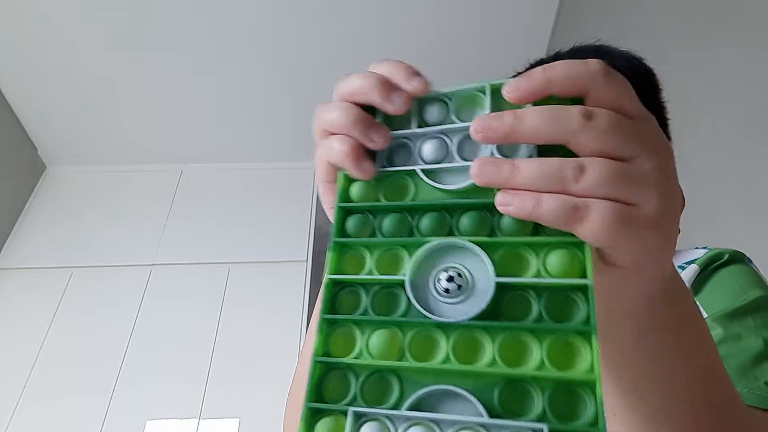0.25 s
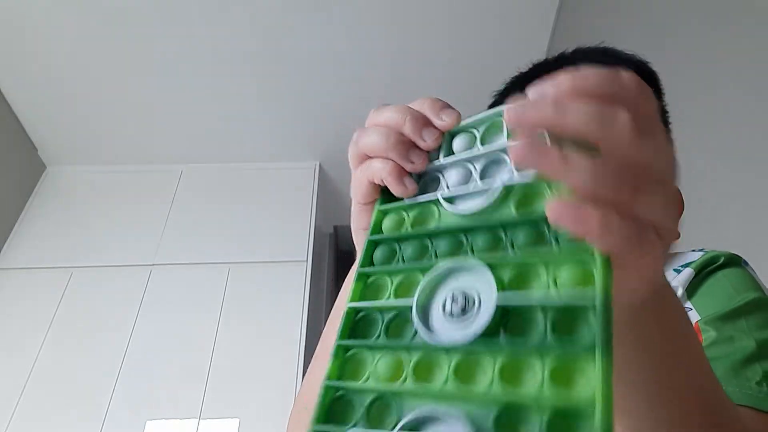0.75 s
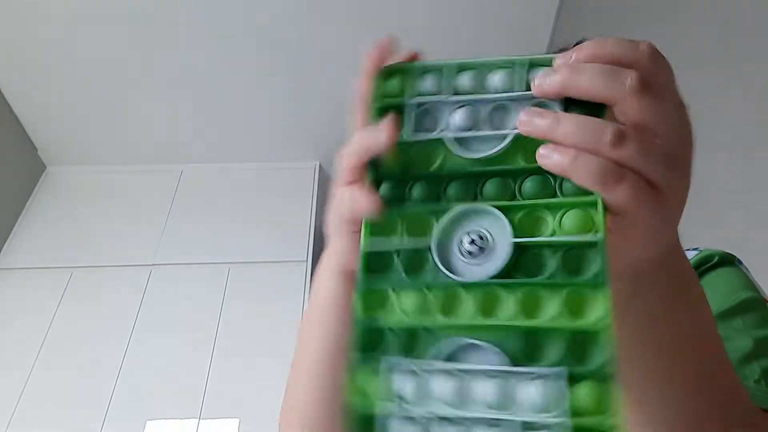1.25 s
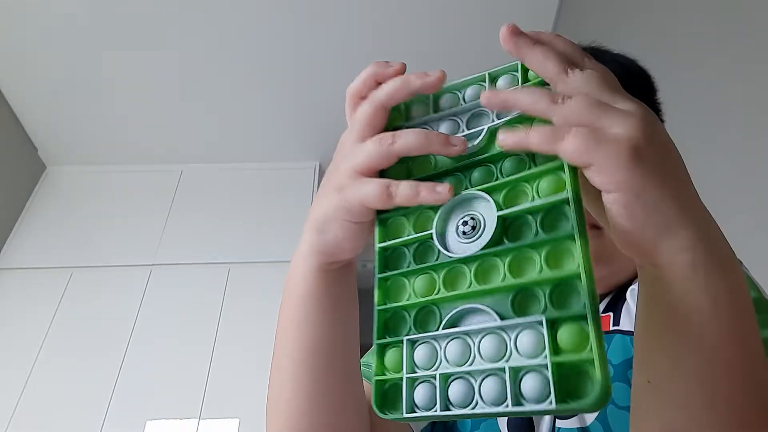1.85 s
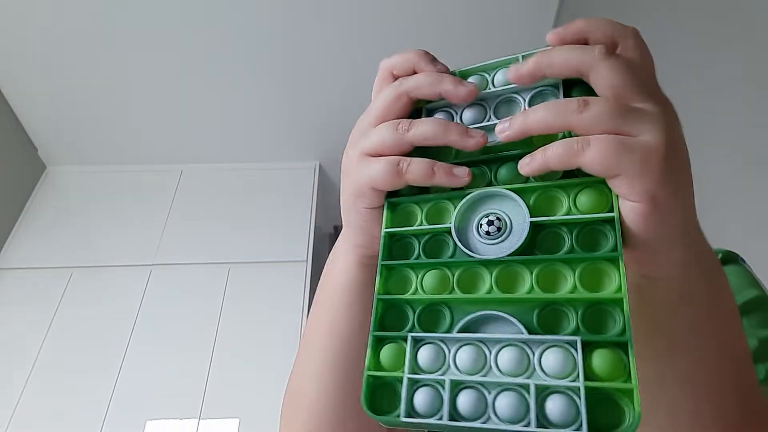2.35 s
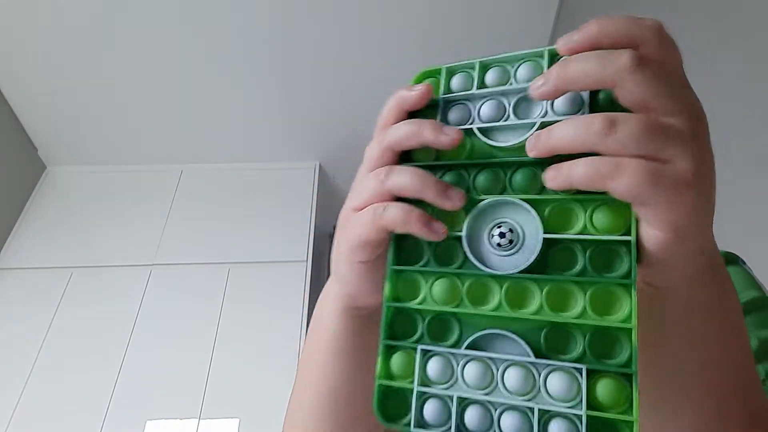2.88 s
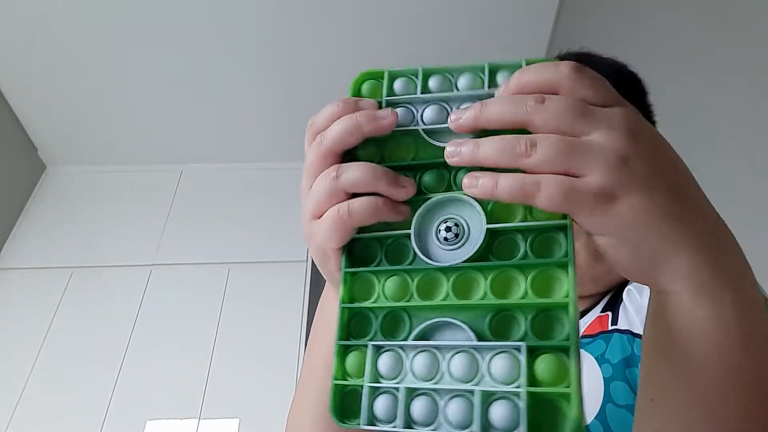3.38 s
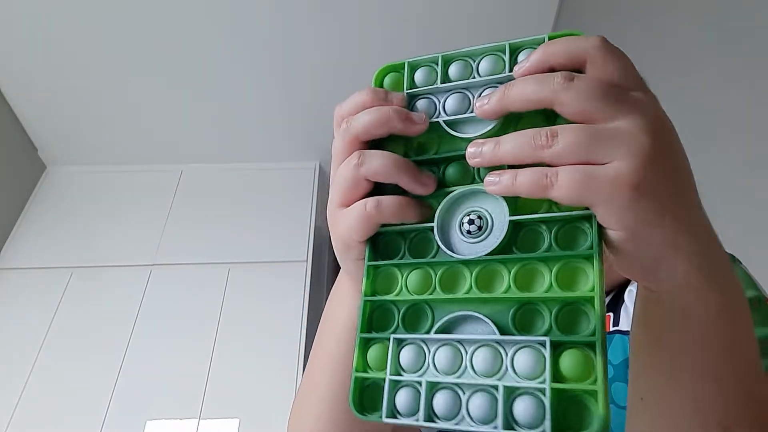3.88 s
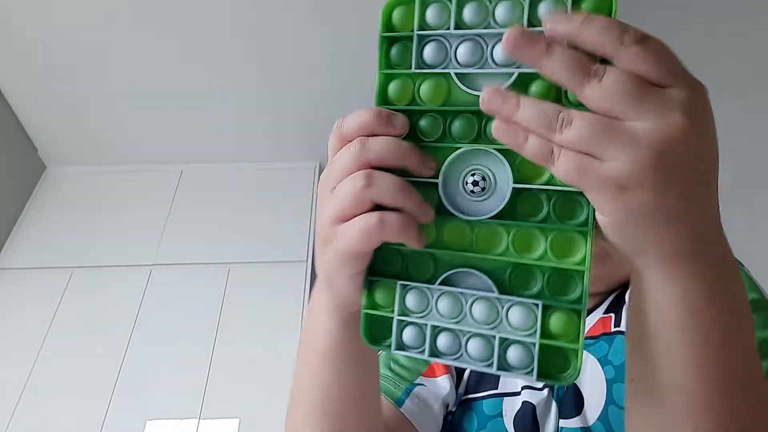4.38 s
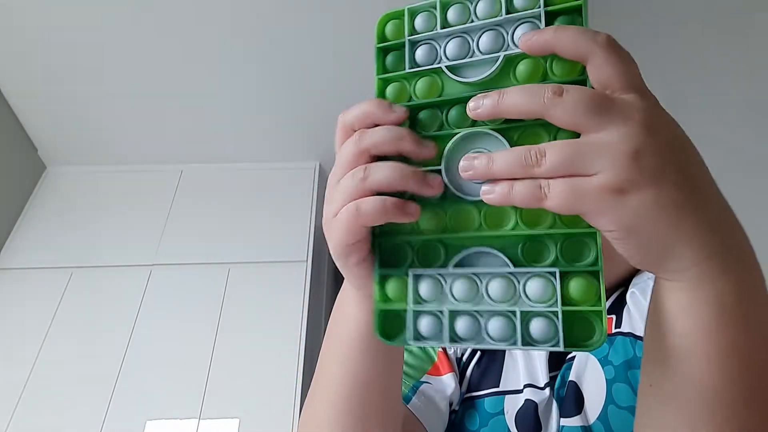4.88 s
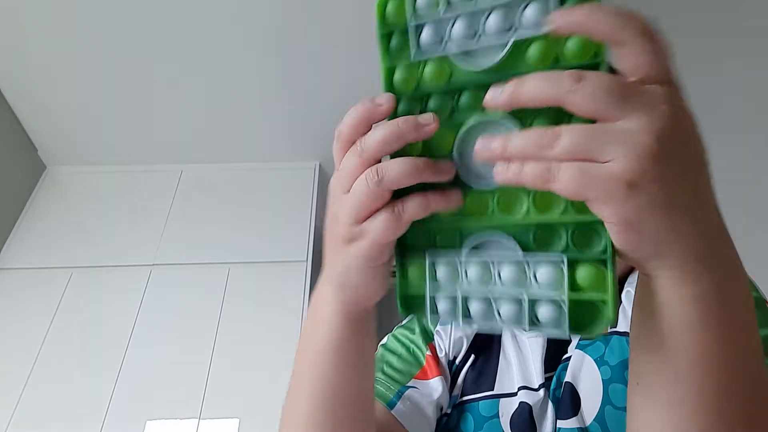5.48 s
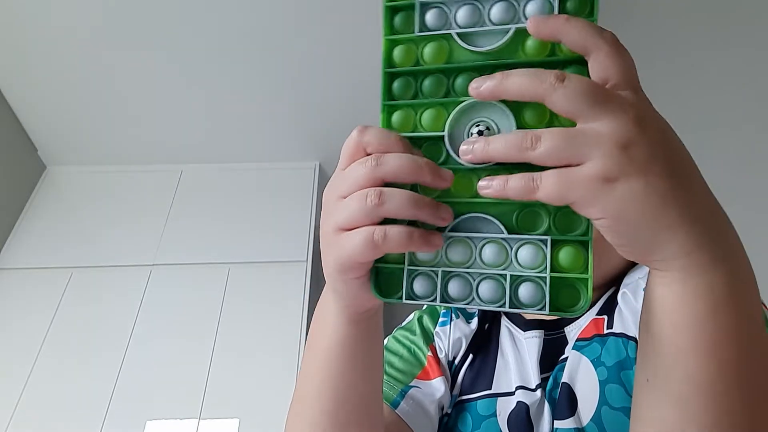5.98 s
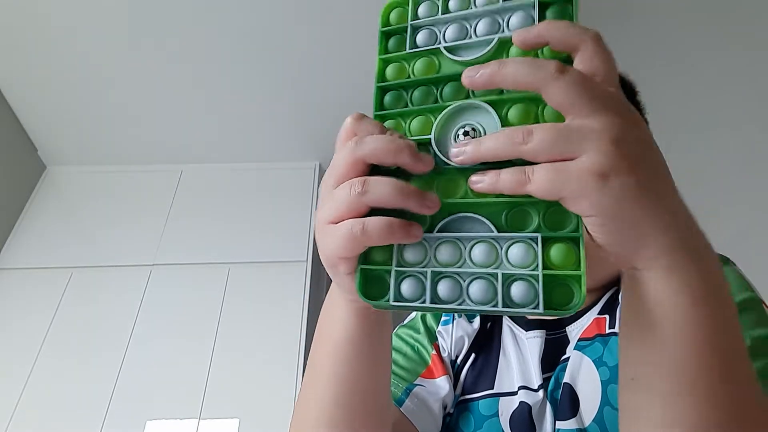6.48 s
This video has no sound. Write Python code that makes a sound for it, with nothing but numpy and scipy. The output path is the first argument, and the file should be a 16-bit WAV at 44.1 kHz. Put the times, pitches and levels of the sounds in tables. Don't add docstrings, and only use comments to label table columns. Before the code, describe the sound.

Sharp hollow rubbery pops of silicone bubbles pushed by fingers, irregularly spaced, close-up in a small bare room, with faint taps and rubs between.

```python
import sys
import numpy as np
from scipy import signal
from scipy.fft import next_fast_len
from scipy.io import wavfile
from scipy.ndimage import uniform_filter1d

SR = 44100
rng = np.random.default_rng(int(sys.argv[2]) if len(sys.argv) > 2 else 0)


def store_pcm(level_fs):
    pcm = np.round(np.clip(level_fs, -1, 1) * 32767).astype(np.int16)
    wavfile.write(sys.argv[1], SR, np.atleast_2d(pcm).T)


def boost(x):
    u = np.asarray(x, float) / 20
    return 10 ** u


N = 297234

# t/s, level/dB, cup f/Hz, cup ring/dB, rebound delay/ms
POPS = [(0.2398, -16, 1123, -4, 1.04), (0.675, -17, 1173, -5, 2), (0.683, -16, 1478, -3, 1.9),
        (1.0281, -16.5, 1160, -14, 1.51), (1.978, -11, 1250, -23.5, 1.44), (2.3441, -14.5, 1126, -10, 0.92),
        (2.504, -16, 1160, 1, 1.45), (3.0257, -21, 1104, 4.5, 1.74), (3.996, -10, 1144, -10.5, 1.7),
        (4.0756, -11, 1050, 5.5, 1.49), (4.861, -16.5, 1157, -19.5, 1.53), (5.199, -30, 1126, 2, 1.55),
        (5.3105, -16.5, 990, 1.5, 1.5), (6.1559, -30, 1110, 2.5, 1.6), (6.2741, -15, 1050, -3, 1.5),
        (6.4254, -17.5, 1316, 5.5, 1.37), (6.55, -17, 1040, 6, 1.53)]
# t/s, level/dB, f/Hz
TAPS = [(0.094, -77, 1634), (0.384, -50.5, 920), (0.403, -51, 2650), (0.968, -60, 1655), (1.208, -48, 1125),
        (1.313, -48, 1860), (1.356, -43, 1770), (1.389, -48.5, 1050), (1.416, -49.5, 852),
        (1.964, -59, 1375), (2.135, -52.5, 956), (2.257, -54, 1735), (3.172, -50.5, 868), (3.247, -53, 914),
        (3.698, -47.5, 832), (4.171, -43.5, 2142), (4.25, -39, 1050), (4.325, -48, 1960),
        (4.369, -46, 1020), (4.456, -49.5, 1730), (4.648, -51.5, 976), (4.994, -39.5, 1808),
        (5.088, -51.5, 970), (5.612, -51.5, 2060), (5.643, -54, 1895), (5.723, -51, 2670),
        (6.089, -51, 767), (6.235, -49, 1500), (6.256, -47.5, 1190), (6.374, -58, 2020)]
# t/s, level/dB, f/Hz, crack/dB
PEELS = [(0.012, -47, 1116, 0.5), (0.044, -48, 1720, -4), (1.11, -36, 1706, -3.5), (1.173, -40, 1960, 6),
         (1.375, -42.5, 1810, -6), (1.527, -60.5, 606, 0), (2.099, -34.5, 1880, -17.5),
         (4.354, -50, 1020, -6), (4.758, -60.5, 720, -7), (1.772, -65, 1155, -8.5), (5.157, -63, 1120, -19),
         (5.545, -55, 1815, -18), (5.598, -58, 2470, -12), (5.74, -49, 845, -12),
         (5.919, -52.5, 965, -20.5), (5.976, -56.5, 1800, -10)]
# t/s of loudest point,
# level/dB, build-up/s, hiss over the rub/dB
RUBS = [(0.004, -55.5, 0.038, -8), (0.399, -63.5, .06, -23.5), (0.43, -71, .03, -26),
        (1.174, -70.5, 0.025, -13), (1.211, -71, 0.051, -7), (1.359, -64, 0.15, -1.5),
        (1.42, -72, 0.044, -18.5), (1.53, -82, 0.044, -1), (2.33, -67, 0.033, -17),
        (2.253, -73, 0.05, -28.5), (2.76, -73.5, 0.088, -8), (3.247, -75.5, 0.045, -26),
        (3.696, -72, 0.014, -7.5), (4.252, -64.5, 0.052, -15.5), (4.376, -62, 0.15, -14.5),
        (4.44, -69.5, 0.066, -8.5), (4.66, -67, 0.048, -24.5), (4.7, -75.5, .04, -20),
        (4.998, -75, 0.028, -3), (5.092, -67.5, 0.032, -6), (5.614, -62, 0.065, -6.5),
        (5.724, -67.5, 0.029, -4.5), (5.918, -65.5, 0.021, -7.5), (6.088, -76, 0.035, -9.5)]
# t/s, level/dB, skin f/Hz, fizz/dB, sparkle/dB
CRACKS = [(0.2384, -23.5, 3980, -23, -41.5), (0.6734, -49, 4000, 0, -6), (0.681, -22, 4154, -3.5, -21),
          (1.0267, -26, 4300, -10, -35.5), (1.9771, -29, 4300, -5, -43), (2.3431, -27.5, 4300, -17, -44.5),
          (2.5027, -28.5, 4446, -19.5, -47), (3.025, -28, 3960, -13, -41),
          (3.6978, -50.5, 5300, -16, -24.5), (3.708, -55.5, 5300, -13.5, -21.5),
          (3.9945, -28, 4800, -10, -34), (4.0747, -26, 3410, -5.5, -46),
          (4.8598, -29.5, 4640, -19.5, -45.5), (5.1979, -48, 4800, 8, -4.5),
          (5.3108, -26.5, 4600, -20, -29.5), (6.1542, -43, 4810, -25.5, -46.5),
          (6.2725, -28, 4680, -13.5, -45), (6.4243, -33.5, 4060, 1.5, -12), (6.5481, -25, 3150, -8, -35)]
# t/s, level/dB, f/Hz, t60/s
KNOCKS = [
    (3.697, -41.5, 361, 0.077),
    (3.703, -52.5, 318, 0.08),
    (3.742, -55.5, 118, 0.049),
    (4.077, -35, 102, 0.099),
    (5.195, -43, 102, 0.095),
]
# t/s, left over right/dB
BEARING = [(.24, 7.5), (.68, 10), (1.031, 7), (1.98, 6), (2.5, 5.5), (3.032, 4.5), (3.998, 7), (4.08, 7),
           (4.86, 6.5), (5.31, 5.5), (6.16, 4), (6.27, 7.5), (6.43, 5), (6.55, 5)]
# f/Hz, width/Hz, level/dB
SHEET_MODES = [(430, 250, -7), (696, 350, -8), (1050, 260, 1), (1750, 1100, -4), (2310, 800, -6.5),
               (3260, 650, -15)]
# delay t/s, level/dB
NEAR_ECHOES = [(.0027, -24.5), (.0036, -25.5), (.0049, -26.5), (.0066, -26.5)]
# delay t/s, level/dB
WALL_ECHOES = [(.0116, -20.5), (0.0122, -20.5), (.0135, -30), (.0205, -28.5), (.0245, -26.5), (.035, -29.5),
               (0.042, -29)]
# f/Hz, t60/s
ROOM_T60 = [(200, .3), (600, 0.33), (1500, 0.29), (4000, 0.26), (8000, 0.25), (14000, .16)]
# f/Hz, level/dB
ROOM_COLOUR = [(200, 7.5), (600, -2.5), (1050, -3), (1900, 1), (3000, 2), (6000, 5.5), (12000, -6.5)]
# f/Hz, likeness/1
ROOM_LIKENESS = [(60, .93), (300, .76), (640, .6), (1400, -.15), (3100, .05), (15000, 0)]
# t/s, peak level/dB, hold/s
HUM_SWELLS = [(0.027, -65.5, .02), (0.264, -60, 0.017), (0.619, -55.5, 0.029), (0.905, -62.5, 0.029),
              (1.107, -65, .03), (1.449, -58, 0.076), (1.945, -64, 0.025), (2.184, -64.5, 0.042),
              (2.666, -63, 0.037), (2.973, -62, 0.4), (3.72, -57, 0.016), (4.08, -51.5, .03),
              (4.615, -63, 0.018), (4.738, -61, 0.044), (5.223, -62.5, 0.065), (5.528, -63, 0.05),
              (5.801, -69.5, 0.028), (6.21, -68, .05), (6.446, -69, .02), (6.734, -60.5, 0.019)]
# f/Hz, level per Hz/dB
HUSH_SPECTRUM = [(20, -40), (32, -26.5), (50, -8.5), (100, -1), (170, -2), (210, -17.5), (310, -8),
                 (480, -23), (650, -24), (1200, -29.5), (2500, -34.5), (5000, -39), (9000, -39.5),
                 (16000, -36)]
# f/Hz, likeness/1
HUSH_LIKENESS = [(60, .9), (130, .72), (290, .66), (640, .33), (1400, .2), (3100, 0), (15000, 0)]
# f/Hz, left over right/dB
HUSH_LEAN = [(60, 4), (180, 2), (550, 4), (1650, 3.5), (4970, -0.5), (15000, 2.5)]

HUSH_DB = -68
HUM_HZ, HUM_IDLE_DB, HUM_RISE_DB_PER_S, HUM_FALL_DB_PER_S = 61.8, -79, 160.5, 141
RUB_BUILD_DB, RUB_LET_GO_DB_PER_S = 19.5, 172.5
TAP_T60_S, LANDING_CRACK_DB = 0.027, -27.5
SNAP_OVER_CUP = 1.193
REBOUND, RIM, RIM_OVER_CUP = 0.29, .22, 1.4
SPRAY_T60_S = 0.0091
CRACK_WALL_DELAY_S = .003
SKIN_WIDTH_HZ, SKIN_RING, SKIN_TOP = 530, 1.4, 1.182
BEAM_DB = 5
KICK_HZ, KICK_DB, KICK_T60_S = 135, -37.5, 0.24
LEFT_DIP, LEFT_DIP_HZ, LEFT_DIP_WIDTH_HZ = 0.27, 5100, 2000


def evened(x):
    return x / np.sqrt(np.mean(x ** 2) + 1e-20)


def read(points, hz):
    f, value = np.transpose(points)
    return np.interp(np.log(hz + 1), np.log(f + 1), value)


def add(mix, s, sound):
    part = mix[..., max(round(s * SR), 0):][..., :sound.shape[-1]]
    part += sound[..., :part.shape[-1]]


def resonate(x, hz, width_hz):
    r = np.exp(-np.pi * width_hz / SR)
    pole = r * np.exp(2j * np.pi * hz / SR)
    return 2 * signal.lfilter([1 - r], [1, -pole], x).real


def band(x, lo_hz, hi_hz):
    return signal.sosfilt(signal.butter(2, [lo_hz, hi_hz], "bandpass", fs=SR, output="sos"), x)


def steep(x, lo_hz, hi_hz):
    return evened(band(band(x, lo_hz, hi_hz), lo_hz, hi_hz))


def pair(likeness, frames, size):
    a, b, c, d = rng.standard_normal((frames, size // 2 + 1, 4)).T
    same = np.clip(read(likeness, np.fft.rfftfreq(size, 1 / SR)), -1, 1)[:, None]
    first, other = a + 1j * b, c + 1j * d
    return np.array([first, same * first + np.sqrt(1 - same ** 2) * other])


def patchy(bands, frames, band_span, frame_span):
    field = rng.standard_normal((bands, frames))
    return evened(uniform_filter1d(uniform_filter1d(field, band_span, 0), frame_span, 1))


def echoes(x, taps):
    out = np.zeros(len(x))
    for s, db in taps:
        add(out, s, boost(db) * x)
    return out


def swells(t, rows, rise_db_per_s, fall_db_per_s):
    total = 0
    for s, db, hold_s in rows:
        rise_db = rise_db_per_s * np.maximum(s - t, 0)
        fall_db = fall_db_per_s * np.maximum(t - s - hold_s, 0)
        total = total + boost(db - rise_db - fall_db)
    return total


def hush():
    frames, hz = N // 512 + 5, np.fft.rfftfreq(2048, 1 / SR)
    lean = read(HUSH_LEAN, hz)[:, None] / 2
    level_db = read(HUSH_SPECTRUM, hz)[:, None] + 1.2 * patchy(len(hz), frames, 8, 8)
    z = pair(HUSH_LIKENESS, frames, size=2048) * boost(level_db + np.array([lean, -lean]))
    z[:, hz < 85] *= .4
    return boost(HUSH_DB) * evened(signal.istft(z, nperseg=2048, noverlap=1536)[1][:, :N])


def hum():
    tone = evened(resonate(resonate(rng.standard_normal(N), HUM_HZ, 9), HUM_HZ, 9))
    envelope = abs(signal.hilbert(tone, next_fast_len(N))[:N])
    tone = boost(-4.0) * evened(tone / (envelope + 0.12))
    load = swells(np.arange(N) / SR, HUM_SWELLS, HUM_RISE_DB_PER_S, HUM_FALL_DB_PER_S)
    return tone * (boost(HUM_IDLE_DB) + load)


def sheet(x):
    total = 0
    for k, (hz, width_hz, db) in enumerate(SHEET_MODES):
        total = total + (-1) ** k * boost(db) * resonate(resonate(x, hz, width_hz), hz, width_hz)
    return total


def rub(s, db, build_s, hiss_db):
    start = max(s - build_s, 0)
    t = np.arange(start, s + .3, 1 / SR)
    slipping = rng.random(len(t)) < 1500 / SR
    size = np.minimum(rng.exponential(1, len(t)), 4)
    noise = rng.standard_normal(len(t))
    slips = noise * (.1 + boost(3.5 * size) * slipping)
    hiss = steep(noise + .3 * slips, 5000, 9800)
    drag = swells(t, [(s, db - 6.5, 0)], RUB_BUILD_DB / build_s, RUB_LET_GO_DB_PER_S)
    sound = evened(sheet(slips)) + boost(hiss_db) * hiss
    return start, drag * sound * signal.windows.tukey(len(t), .04)


def tap(s, db, hz, crack_db=LANDING_CRACK_DB):
    t = np.arange(3000) / SR
    attack = np.sin(np.pi / 2 * np.minimum(t / .0012, 1)) ** 2
    shape = attack * boost(-60 * t / TAP_T60_S)
    noise = rng.standard_normal((2, len(t)))
    dome = evened(resonate(resonate(noise[0], hz, 420), hz, 420))
    ring = np.array([[.65], [.25]]) * dome + .55 * evened(sheet(noise[0]))
    skin = steep(noise[1], 3200, 10500) * boost(crack_db - 60 * t / .012)
    return s - .0008, boost(db - 2.5) * shape * (ring + skin)


def pop(s, db, cup_hz, cup_db, rebound_ms):
    lead_s = .006
    t = np.arange(1600) / SR - lead_s
    mouth = np.array([[1], [.45]])
    cup_t60 = .024 / (1 + 1.3 * boost(cup_db))

    def ring(t, hz, t60):
        t = np.maximum(t, 0)
        return mouth * np.sin(2 * np.pi * hz * t) * boost(-60 * t / t60)

    def flip(t):
        phase = 2 * np.pi * SNAP_OVER_CUP * cup_hz * t
        swing = phase * np.exp(.5 - phase ** 2 / 2)
        return swing + boost(cup_db) * ring(t, cup_hz, cup_t60)

    rebound = mouth * REBOUND * flip(t - rebound_ms / 1000)
    dome = flip(t) + rebound + RIM * ring(t, RIM_OVER_CUP * cup_hz, .016)
    dome = signal.sosfiltfilt(signal.butter(3, 290, "highpass", fs=SR, output="sos"), dome)
    creep = steep(rng.standard_normal(len(t)), 800, 2600) * boost(-29 - 60 * abs(t) / .011)
    return s - lead_s, boost(db) * (dome + creep)


def crack(s, db, skin_hz, fizz_db, sparkle_db):
    t = np.arange(1200) / SR
    tick = t == 0
    spray = .35 * rng.standard_normal(len(t)) * boost(-60 * t / SPRAY_T60_S) + tick
    to_walls = .5 * spray + 1.07 * np.linalg.norm(spray) * tick
    blows = np.array([spray, np.roll(to_walls, round(CRACK_WALL_DELAY_S * SR))])
    beam = boost([[BEAM_DB], [0]])
    skin = band(blows, 1600, SKIN_TOP * skin_hz)
    broad = band(skin, 1800, SKIN_TOP * skin_hz)
    ring = SKIN_RING * resonate(skin, skin_hz, SKIN_WIDTH_HZ)
    fizz = beam * boost(fizz_db) * band(blows, 4400, 9000)
    sparkle = beam * boost(sparkle_db) * band(blows, 9500, 15500)
    return s + .001, boost(db + 11) * (broad + ring + fizz + sparkle)


def thump(s, db, hz, t60):
    t = np.arange(6000) / SR
    mode = np.sin(2 * np.pi * hz * t) * boost(-60 * t / .05)
    wobble = .45 * steep(rng.standard_normal(len(t)), hz * .35, hz * 1.4)
    shape = boost(db - 60 * t / t60) * (1 - np.exp(-t / .0015))
    return s, band(shape * (mode + wobble), 65, 700)


def room(x):
    hz, t = np.fft.rfftfreq(128, 1 / SR)[:, None], np.arange(700) * 32 / SR
    late = np.zeros((2, N))
    for k in range(3):
        z = pair(ROOM_LIKENESS, len(t), size=128)
        z *= boost(read(ROOM_COLOUR, hz) - 60 * t / read(ROOM_T60, hz))
        z *= boost(4.5 * patchy(len(hz), len(t), 6, 5) * np.exp(-t / .07))
        tail = signal.istft(z, nperseg=128, noverlap=96)[1]
        tail *= np.clip((np.arange(tail.shape[1]) / SR - .010) / 0.0055, 0, 1)
        share = np.cos(np.pi * (2.3 * np.arange(N) / SR + k / 3)) * np.sqrt(2 / 3)
        late += signal.fftconvolve((share * x)[None], tail / np.linalg.norm(tail[0]), axes=1)[:, :N]
    right_walls = [(s + .0002, db - 1.5) for s, db in WALL_ECHOES]
    walls = np.array([echoes(x, WALL_ECHOES), echoes(x, right_walls)])
    return boost(-12.5) * late * boost([[1.1], [-1.1]]) + walls


def scene():
    sides = np.zeros((2, N))
    kicks = [(s, db + KICK_DB, KICK_HZ * rng.uniform(.8, 1.1), KICK_T60_S) for s, db, *_ in POPS]
    sources = ((rub, RUBS), (tap, PEELS), (tap, TAPS), (pop, POPS), (crack, CRACKS),
               (thump, kicks), (thump, KNOCKS))
    for source, rows in sources:
        for row in rows:
            add(sides, *source(*row))
    toy, away = sides
    lean = np.interp(np.arange(N) / SR, *np.transpose(BEARING)) / 2
    late = np.roll(toy, 2)
    lifted = late + 0.2 * resonate(late, 4300, 2000)
    shaded = toy - LEFT_DIP * resonate(toy, LEFT_DIP_HZ, LEFT_DIP_WIDTH_HZ)
    left = boost(lean) * shaded + echoes(toy, NEAR_ECHOES)
    right = boost(-lean) * lifted + echoes(toy, [(s + .0001, db - 1.5) for s, db in NEAR_ECHOES])
    return np.array([left, right]) + room(away) + hush() + hum()


def top_cut(x):
    return signal.sosfilt(signal.butter(12, 16710, fs=SR, output="sos"), x)


def record(dry):
    dry = dry / (1 + abs(dry / 1.05) ** 4) ** .25
    edge = signal.firwin(301, 15900, fs=SR)
    mix = signal.oaconvolve(dry, edge[None], "same")
    return top_cut(mix)


dry = scene()
out = record(dry)
store_pcm(out)
```